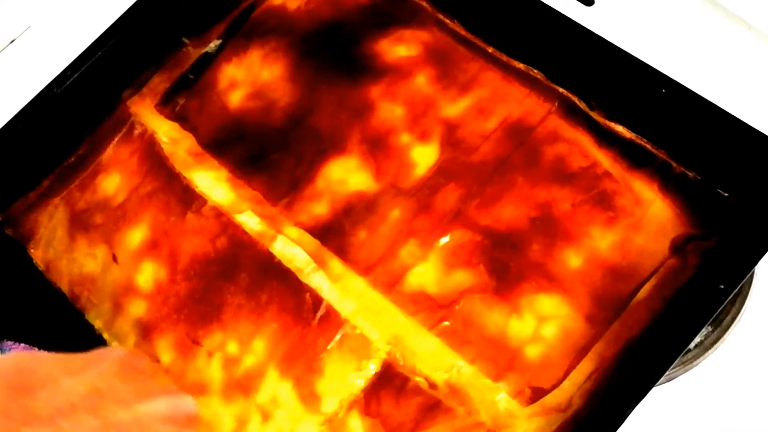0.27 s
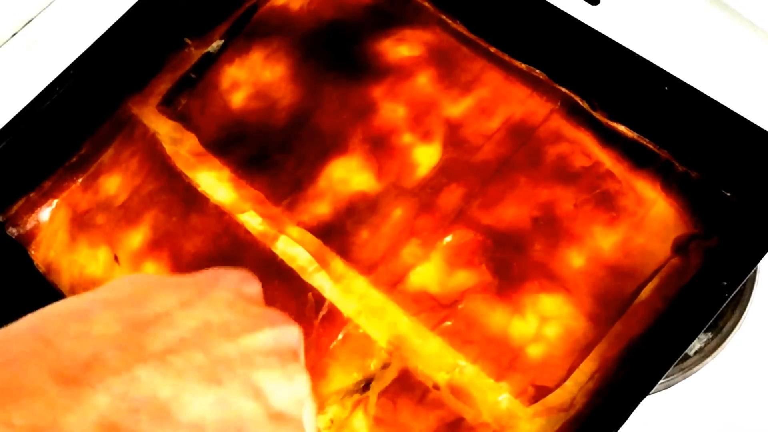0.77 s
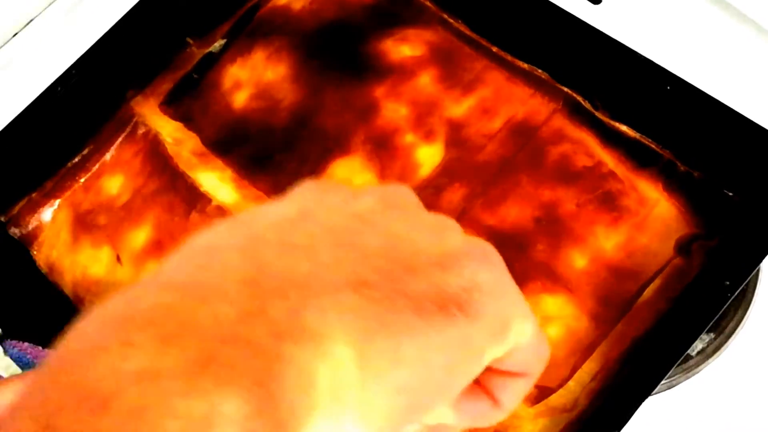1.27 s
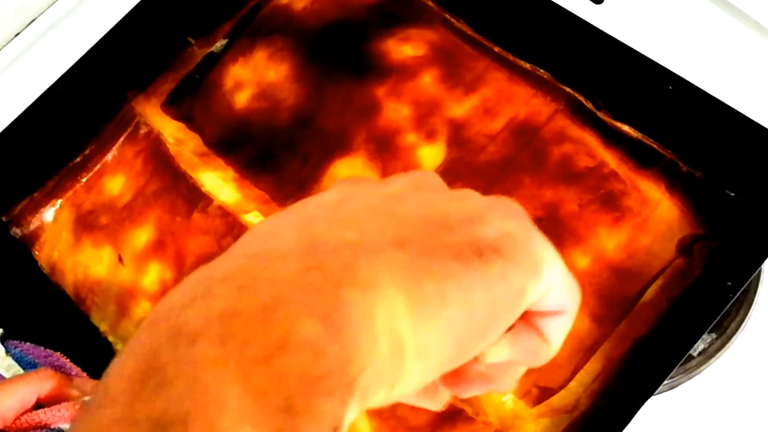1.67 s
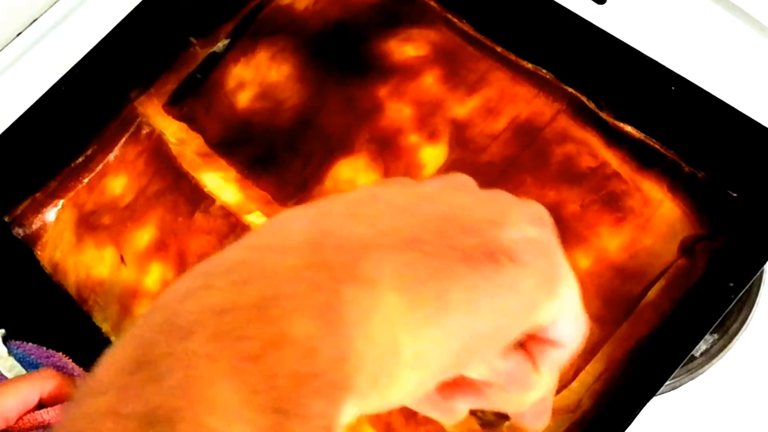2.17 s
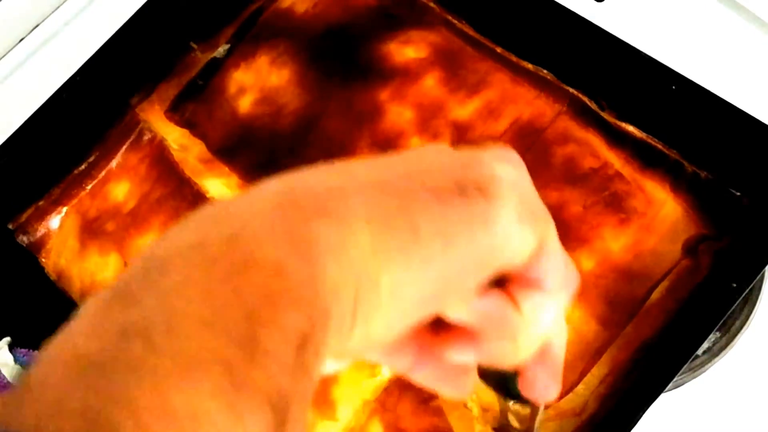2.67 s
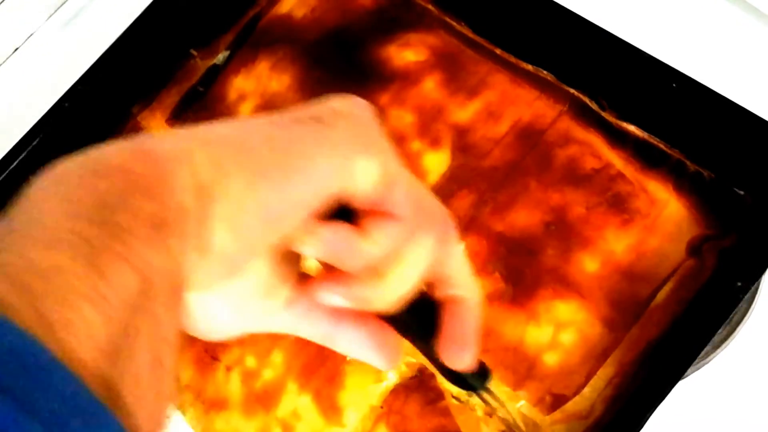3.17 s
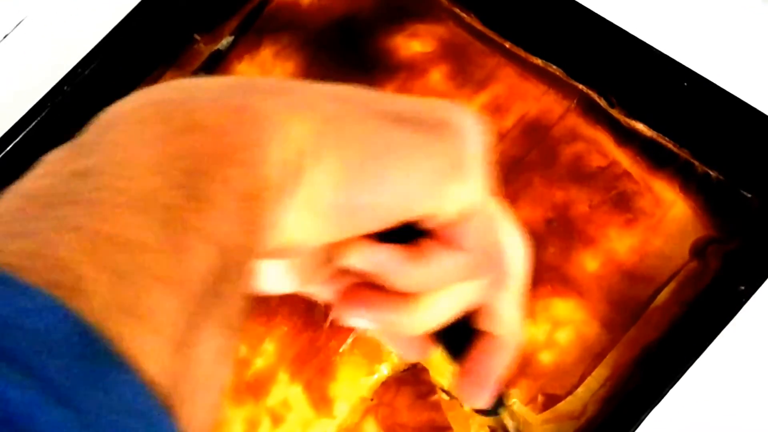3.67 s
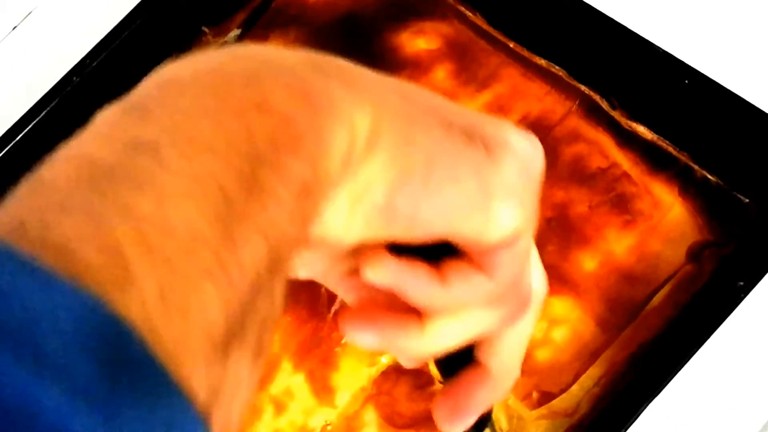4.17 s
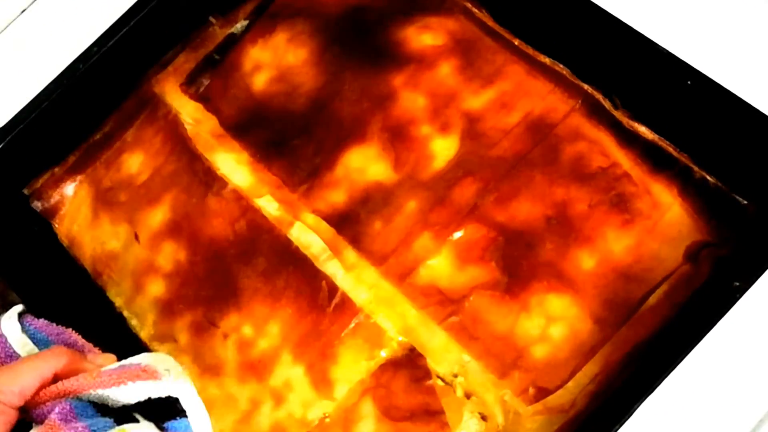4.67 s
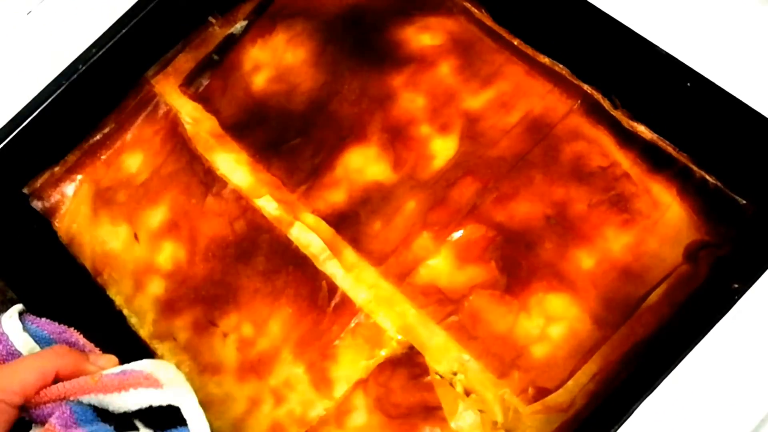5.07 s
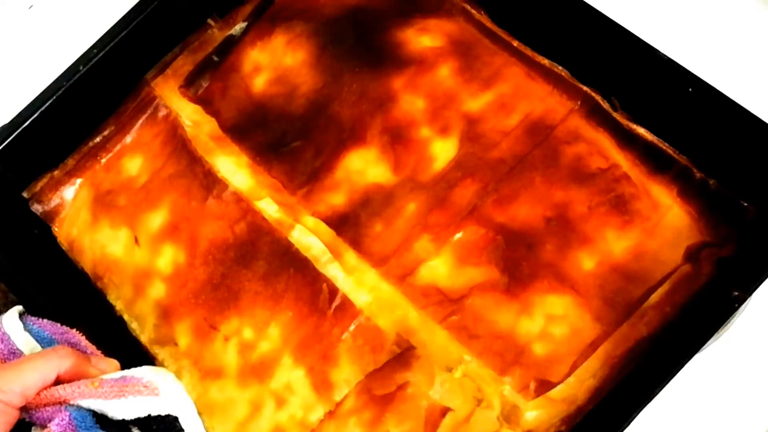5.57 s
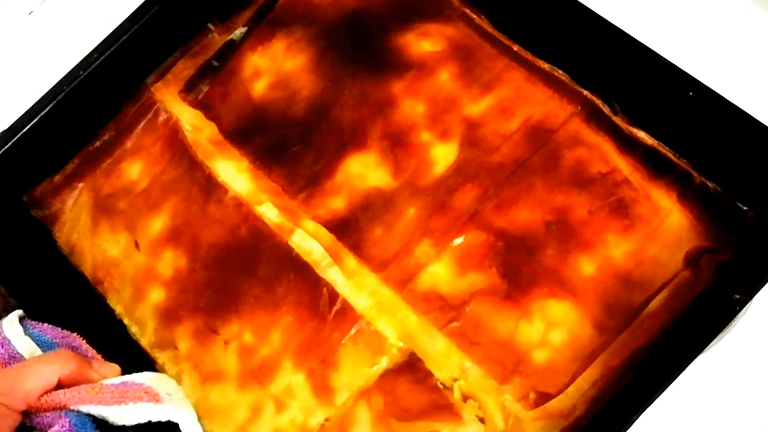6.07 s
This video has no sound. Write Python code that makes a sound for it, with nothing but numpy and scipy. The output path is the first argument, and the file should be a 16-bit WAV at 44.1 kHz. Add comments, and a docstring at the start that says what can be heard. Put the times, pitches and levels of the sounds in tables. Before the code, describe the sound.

Close stereo pickup, slightly louder on the left: a blade breaks brittle baked crust in a metal tin. A soft crunch and a short squeal lead to one hard metallic knock, far louder than anything after. Then small snaps, dull taps and gritty rubbing come and go, the tin thudding low on its support. The crunching grows denser, pauses, returns briefly and ends in a thin gliding scrape, with faint room hiss and hum.

```python
"""A knife cuts crisp baked pastry in a metal baking tin, close by in a kitchen with faint hiss and hum.
At once it knocks, breaks the crust and squeals, with one very hard knock that twangs blade and tin (modes).
Showers of random fractures then crackle on and off, amid filtered-grain scrapes and lighter knocks, while
the tin booms low on its support (pushed modes and shaped noise).
The last crackles give way to a final scrape with gliding squeals (narrow noise on a swept carrier)."""
import sys
import numpy as np
from scipy import signal
from scipy.fft import rfft, irfft, next_fast_len
from scipy.io import wavfile
from scipy.ndimage import uniform_filter1d

SR = 44100
rng = np.random.default_rng(int(sys.argv[2]) if len(sys.argv) > 2 else 0)


def generate_wav(sig):
    """Save sig (samples, or channels by samples) to the path in sys.argv[1] as 16-bit PCM at SR."""
    pcm = np.round(np.clip(np.atleast_2d(sig).T, -1, 1) * 32767).astype(np.int16)
    wavfile.write(sys.argv[1], SR, pcm)


N = 278667
TIME = np.arange(N) / SR

# The crust gives way. Each row: start in seconds, time scale of the break in seconds, level in dB,
# crispness (treble against the middle) in dB.
CRUST_BREAKS = [(0.065, 0.008, -21.5, -26), (0.503, 0.0026, -34.5, -9), (0.536, 0.0037, -42, -9),
                (0.577, 0.00041, -38.5, -11), (.622, 0.0015, -46.5, -3), (0.881, 0.0023, -34, -9),
                (0.907, 0.0015, -37.5, -8), (0.933, 0.0041, -35, -3), (1.027, 0.0042, -59, 7.5),
                (1.723, 0.0025, -43, 8), (1.74, 0.0064, -36.5, -5), (1.952, 0.0031, -41, -13.5),
                (1.974, 0.022, -37.5, 2.5), (2.1198, 0.0013, -25.5, -4.5), (2.295, 0.0033, -35.5, -15),
                (2.409, 0.0093, -30.5, -20.5), (2.457, 0.011, -42, -7), (2.512, .0015, -39.5, -7),
                (2.587, 0.0078, -28.5, -4), (2.812, 0.021, -42, 9), (2.842, 0.0093, -21, -19.5),
                (3.033, 0.0076, -37.5, -15.5), (3.064, 0.017, -38.5, -12.5), (3.347, 0.013, -36, 4.5),
                (3.383, 0.013, -31.5, -14), (3.438, 0.011, -27, -10.5), (3.597, 0.0054, -36, -6.5),
                (3.853, 0.011, -36.5, -2), (3.971, 0.005, -27, -8.5), (4.03, 0.0081, -35, -4.5),
                (4.108, 0.019, -28.5, -6), (5.025, 0.01, -34.5, -18), (5.083, 0.0044, -25, -18),
                (5.123, 0.0035, -36, -17), (5.185, 0.0051, -36, -5.5), (5.24, 0.014, -33.5, -6)]
# Blade and tin knock together. Each row: start in seconds, time scale in seconds, level in dB,
# weight (bass against the middle) in dB, treble against the middle in dB, twang of the blade in dB,
# ring of the tin in dB, pitch that the struck spot favours in Hz.
TIN_KNOCKS = [(0.033, 0.0065, -26, -7.5, -41, -50, -50, 520),
              (0.2225, 0.004, -3, -6.5, -14.5, -11, -43.5, 882),
              (0.6425, 0.0061, -27, 6.5, -20, -33, -41.5, 510),
              (.785, 0.0076, -26.5, -1, -13, -47, -43, 510),
              (0.806, 0.0032, -27, 3.5, -69, -38, -51.5, 520),
              (1.523, 0.0055, -28.5, 6.5, -23.5, -35, -42, 506),
              (1.753, 0.0045, -35.5, 3, -1.5, -52, -52, 510), (3.97, 0.0034, -39.5, 1, 7, -64, -47.5, 796),
              (4.495, 0.013, -36, -3.5, 3, -47, -41, 1230), (4.68, 0.009, -45, 2, -0.5, -50, -63, 3580),
              (4.949, 0.0077, -28, -15, -27, -37, -50, 1800),
              (5.694, 0.0083, -39, -0.5, -16.5, -50, -56, 2900)]
# Modes of the baking tin. Each row: frequency in Hz, level in dB, T60 in seconds.
TIN_MODES = [(513.5, 6.5, 0.21), (572, -0.5, 0.19), (772, -0.5, 0.2), (877, -2, .25), (1253, 2.5, 0.18),
             (1380, 2.5, 0.17), (1460, -4, 0.28), (2275, -2.5, 0.073), (2950, 2.5, 0.3), (3640, -2.5, 0.32),
             (4800, -3, 0.6)]


def amp(db):
    """Decibels to linear gain."""
    return 10 ** (np.asarray(db) / 20)


def evened(x):
    """Scales a signal to an RMS of 1."""
    return x / np.sqrt(np.mean(x ** 2) + 1e-20)


def read(points, hz):
    """Reads a curve of (Hz, value) points along a logarithmic frequency axis."""
    f, value = np.transpose(points)
    return np.interp(np.log(hz + 1), np.log(f + 1), value)


def add(mix, s, sound):
    """Lays a sound into the mix from second s on."""
    part = mix[max(round(s * SR), 0):][:len(sound)]
    part += sound[:len(part)]


def colour(x, points):
    """Filters by a spectrum in dB, with causal phase so that attacks stay sharp."""
    size = next_fast_len(x.shape[-1] + 2048)
    log_gain = np.log(amp(read(points, abs(np.fft.fftfreq(size, 1 / SR)))))
    response = np.exp(np.conj(signal.hilbert(log_gain)))[:size // 2 + 1]
    return irfft(rfft(x, size) * response, size)[..., :x.shape[-1]]


def convolve(x, response):
    """Runs a sound through an impulse response, channel by channel."""
    return signal.oaconvolve(np.atleast_2d(x), np.atleast_2d(response), axes=1)[:, :N]


def whitened(x, order=300):
    """Levels the broad trend of a short burst's spectrum; order is the smoothing width in bins."""
    z = rfft(x)
    trend = np.sqrt(uniform_filter1d(abs(z) ** 2, order) + 1e-12)
    return irfft(z / trend, x.shape[-1])


def grains(count, per_s, spread_db):
    """Tiny fractures at random moments: many small, a few large."""
    size = amp(spread_db * np.minimum(rng.exponential(1, count), 4))
    return size * rng.standard_normal(count) * (rng.random(count) < per_s / SR)


def pair(x):
    """Two independent signals become more alike towards the bass, as at two nearby microphones."""
    # Left-right likeness. Each row: frequency in Hz, share in common from 0 to 1.
    likeness = [(200, 0.9), (330, 0.3), (2000, 0.034)]
    same = np.clip(read(likeness, np.fft.rfftfreq(x.shape[1], 1 / SR)), 0, 1)
    left, other = rfft(x)
    right = same * left + np.sqrt(1 - same ** 2) * other
    return irfft(np.array([left, right]), x.shape[1])


def kitchen(x, near_db, room_db, direct_db=-7, near_t60=0.047, size=22050):
    """Direct sound, quick reflections from tin and worktop, and the tail of a small hard room."""
    # Decay of the room. Each row: frequency in Hz, T60 in seconds.
    room_decay = [(150, 0.8), (600, 0.45), (15000, 0.33)]
    t = np.arange(size) / SR
    echoes = rng.random((2, size)) < 3000 / SR  # about 3000 a second
    near = rng.standard_normal((2, size)) * echoes * amp(-60 * t / near_t60)
    near = pair(whitened(near, order=200)) * (t < 2 * near_t60)
    hz, when, z = signal.stft(rng.standard_normal((2, size)), SR, nperseg=256)
    z = z * amp(-60 * when / read(room_decay, hz)[:, None])
    tail = signal.istft(z, SR, nperseg=256)[1][:, :size]
    tail = pair(evened(tail * np.minimum(t / 0.0022, 1))) / np.sqrt(size)
    tail = tail * np.minimum(4 * (1 - t / t[-1]), 1) ** 2  # fades out over its last quarter
    return amp(direct_db) * x + convolve(x, amp(near_db) * near + amp(room_db) * tail)


def background(hiss_db=-74.5, hum_hz=98, hum_db=-77):
    """Faint room noise, as filtered noise, and the hum of an appliance, as one sine."""
    # Spectrum of the room noise. Each row: frequency in Hz, density in dB per Hz.
    hiss_spectrum = [(60, 0), (150, -4), (400, -17), (1400, -13), (10000, -21), (16000, -35)]
    hiss = evened(colour(pair(rng.standard_normal((2, N))), hiss_spectrum))
    return amp(hiss_db) * hiss + amp(hum_db) * np.sin(2 * np.pi * hum_hz * TIME)


def shoves(thump_db=-8.5, thump_s=0.0016, lean_s=0.0056):
    """Hand and weighty knocks push the tin on its support: (start s, level dB, push length s)."""
    # Further pushes on the tin: the hand pressing, and the hard knock's own push at 0.219 s. Each row: start in
    # seconds, level in dB.
    further_pushes = [(0.038, -28), (0.127, -29), (0.219, -32), (0.333, -32), (.369, -28.5), (1.711, -40.5),
                      (1.756, -39), (3.14, -42), (3.303, -33), (3.895, -29.5), (3.932, -34)]
    thumps = [(s, db + thump_db, thump_s) for s, _, db, weight, *_ in TIN_KNOCKS if weight > 0]
    return thumps + [(s, db, lean_s) for s, db in further_pushes]


def bumps(shake_db=0, size=22050):
    """Soft pushes set the tin booming on its support; a longer push sounds deeper."""
    # Pressure of the hands shakes the tin. Each row: time in seconds, level in dB.
    shake_level = [(0.0, -48), (.32, -51.5), (0.385, -36.5), (.48, -49.5), (1.2, -75), (3.2, -62),
                   (3.4, -49.5), (3.84, -68.5), (3.92, -40.5), (4.42, -73.5), (6.08, -67), (6.2, -84)]
    # Modes of the tin on its support. Each row: frequency in Hz, level in dB, T60 in seconds.
    support_modes = [(38.52, -20, 1), (104.6, -6.5, 0.35), (184, 1.5, 0.063), (254, 1, 0.15),
                     (310, -8.5, 0.27)]
    # Spectrum of the shaking. Each row: frequency in Hz, density in dB per Hz.
    rumble_spectrum = [(15, -25.5), (36, 1.5), (55, -13.5), (82, -14.5), (106, 1), (135, -14.5), (230, -19),
                       (900, -66.5)]
    pushes, t = np.zeros(N), np.arange(size) / SR
    for s, db, length in shoves():
        push = np.hanning(int(length * SR) + 3)
        add(pushes, s, amp(db) * push / push.sum())
    boom = np.zeros(size)
    for k, (hz, db, t60) in enumerate(support_modes):
        boom += (-1) ** k * amp(db - 60 * t / t60) * np.sin(2 * np.pi * hz * t)  # alternating polarity
    when, level_db = np.transpose(shake_level)
    rumble = evened(colour(rng.standard_normal(N), rumble_spectrum))
    shake = rumble * amp(np.interp(TIME, when, level_db))
    return amp(shake_db) * shake + convolve(pushes, boom)


def ringing(modes, apart=1.6, waver=0.033, order=300, size=16000):
    """Dying modes that waver as pastry and hand load the tin, a little out of phase at the two microphones."""
    t = np.arange(size) / SR
    phases = 2 * np.pi * rng.random((len(modes), 1, 1))
    phases = phases + apart * rng.uniform(-1.9, 1, (len(modes), 2, 1))
    drift = evened(uniform_filter1d(rng.standard_normal((len(modes), size)), order))
    clocks = t + waver * np.cumsum(drift, axis=1) / SR  # each mode runs on its own unsteady clock
    out = np.zeros((2, size))
    for (hz, db, t60), phase, clock in zip(modes, phases, clocks):
        out += amp(db - 60 * t / t60) * np.sin(2 * np.pi * hz * clock + phase)
    return out


def tin(x, ring_db):
    """The tin rings along with whatever touches it."""
    return x + amp(ring_db) * convolve(x, ringing(TIN_MODES))


def squeals():
    """Stick and slip in a narrow resonance that glides as the blade moves."""
    # The blade catches. Each row: start in seconds, length in seconds, start pitch in Hz,
    # end pitch in Hz, bandwidth in Hz, level in dB.
    catches = [(0.187, 0.05, 3010, 4510, 1200, -45), (1.304, 0.064, 5455, 6076, 698, -55),
               (4.68, 0.11, 4060, 3620, 410, -61.5), (5.779, 0.13, 890, 788, 80.2, -58),
               (5.789, 0.12, 3354, 3130, 201.3, -59), (5.811, 0.27, 4180, 4590, 201, -56),
               (5.871, 0.065, 1301, 1237, 50.3, -49.5), (5.912, 0.05, 1410, 2014, 295, -46.5)]
    out = np.zeros(N)
    for s, length, start_hz, end_hz, width, db in catches:
        count = int(length * SR)
        pole = np.exp(-np.pi * width / SR)
        wobble = signal.lfilter([1], [1, -pole], rng.standard_normal((2, N // 20)))[:, :count]
        turn = 2 * np.pi * np.cumsum(np.linspace(start_hz, end_hz, count)) / SR
        squeal = wobble[0] * np.cos(turn) + wobble[1] * np.sin(turn)
        add(out, s, amp(db) * evened(squeal * np.hanning(count)))
    return out


def strokes(lead_s=0.029, trail_s=0.084, slide_db=-26.5, slide_crisp_db=7, slide_groan_db=-9.5):
    """All strokes and slides: (start s, hardest s, end s, groan dB, rubbing dB, flaking dB)."""
    # Long strokes of the blade. Each row: start in seconds, hardest moment in seconds, end in seconds,
    # rubbing level in dB, flaking crust in dB and groaning tin in dB, both against the rubbing.
    # A row that ends before it starts is silent.
    long_strokes = [(0, 0.036, 0.28, -43.5, -11.5, -3.5), (0.713, 0.774, 0.87, -50.5, -14.5, -2),
                    (1.018, 1.094, 1.09, -72.5, 15.5, -19.5), (1.588, 1.642, 1.79, -58.5, -21, 2),
                    (2.203, 2.227, 2.323, -53.5, -6, 8), (2.393, 2.465, 2.52, -59, -44, 5.5),
                    (2.533, 2.59, 2.707, -55.5, -6, 10.5), (3.083, 3.185, 3.315, -59.5, -16.5, -4),
                    (3.352, 3.401, 3.26, -45, -14, 1), (4.13, 4.205, 3.72, -56.5, 0, 0),
                    (4.748, 4.839, 4.9, -53.5, -4, -7), (4.924, 4.987, 5.23, -49.5, -7.5, -3),
                    (5.033, 5.13, 5.26, -57.5, 1.5, 2), (5.736, 5.93, 6.1, -49, -16, -11.5),
                    (5.906, 5.984, 6.04, -50, 11, -29)]
    # the blade presses in before each break and slides on after it
    slides = [(s - lead_s, s + length, s + length + trail_s, db + slide_db, crisp + slide_crisp_db, slide_groan_db)
              for s, length, db, crisp in CRUST_BREAKS]
    return [(start, hardest, end, db + groan, db, db + crisp)
            for start, hardest, end, db, crisp, groan in [*long_strokes, *slides]]


def crumbs(per_s, centre_hz, octaves, cycles, spread_db=4, size=2048):
    """Separate crumbs give way at random moments, each ringing for a few cycles at a pitch of its own."""
    out, t = np.zeros(N), np.arange(size) / SR
    for when, strength, pitch in rng.random((size, 3))[:int(per_s * N / SR)]:
        turns = t * centre_hz * 2 ** (octaves * (2 * pitch - 1))
        ring = np.exp(-turns / cycles) * np.sin(2 * np.pi * turns)
        add(out, when * N / SR, amp(-spread_db * np.log(strength + .02)) * ring)
    return evened(out)


def drag(uneven_db=2.5, fade_db=16, crunch_db=0, crumbs_db=-3.5):
    """Slips, crumbs and flakes swell and fade with each stroke, surging as the knife sticks and gives."""
    # Spectra of the groaning tin, the rubbing blade and the flaking crust.
    # Each row: frequency in Hz, density in dB per Hz.
    groan_spectrum = [(240, -2), (530, 3), (680, -10.5), (880, 0), (1100, -6.5), (1600, -8), (4000, -34)]
    rub_spectrum = [(200,-26), (700,-13.5), (1300,1.5), (1800,0.5), (2700,-1), (4200,-2), (6000,-6.5),
                    (12000,-24)]
    flake_spectrum = [(800, -28), (2500, -4.5), (5000, 5), (9000, 6.5), (13000, -3.5), (16000, -9.5)]
    effort = np.zeros((3, N))  # groan, rubbing, flaking
    for start, hardest, end, *levels in strokes():
        span = slice(max(round(start * SR), 0), round(end * SR))
        shape = np.interp(TIME[span], [start, hardest, end], [0, 1, 0])
        swell = amp(fade_db * (shape - 1)) * np.minimum(8 * shape, 1)
        effort[:, span] += amp(levels)[:, None] * swell
    slow = [(1, 1.5), (45, -1.5), (150, -34.5), (1000, -85.0)]  # Hz, dB per Hz
    surge = amp(uneven_db * evened(colour(rng.standard_normal(N), slow)))
    groan = evened(colour(grains(N, 1500, 0.85) * surge, groan_spectrum))
    groan = groan + amp(crunch_db) * crumbs(190, 930, .25, 7.4)  # hollow crunches
    rub = evened(colour(grains(N, 2500, 3.0) * surge, rub_spectrum))
    rub = rub + amp(crumbs_db) * crumbs(160, 2300, 0.9, 8.3)  # coarse crumbs
    flake = colour(grains(N, 730, 2.7) * surge, flake_spectrum)
    return evened(groan) * effort[0] + evened(rub) * effort[1] + evened(flake) * effort[2]


def scraping(turns_per_s=2.7):
    """The blade travels as it scrapes, so its sound keeps shifting between two reflection paths."""
    sound = tin(drag() + squeals(), ring_db=-61.0)
    turn = 2 * np.pi * turns_per_s * TIME
    return sum(kitchen(sound * share, near_db=-1.0, room_db=-9.5) for share in (np.cos(turn), np.sin(turn)))


def bursts(rows, per_s=3500, spread_db=3.5, patchy_db=3.0, snap_s=0.0032, size=4096):
    """Each contact or break is a shower of fractures that swells and dies, with a colour of its own."""
    out, t = np.zeros(N), np.arange(size) / SR
    hz = np.geomspace(100, 16000, 30)
    for s, length, db, bass_db, treble_db in rows:
        u = t / max(length, .001)
        shower = grains(size, per_s, spread_db) + 0.4 * rng.standard_normal(size)
        shower = whitened(shower * u ** 1.87 * np.exp(-3 * u))
        shower[np.argmax(u > .5)] += 3 * np.exp(-length / snap_s)  # one clean snap, strongest in short breaks
        tone = [(100, bass_db - 16.0), (380, bass_db - 6), (530, bass_db), (680, bass_db - 5.5),
                (900, 0.9 * bass_db + 0.5), (1400, 0.75), (2250, 0.39 * treble_db + 0.5),
                (2800, 0.43 * treble_db), (4100, 0.23 * treble_db), (6000, 0.79 * treble_db + 0.5),
                (10000, treble_db), (16000, 1.3 * treble_db - 7.5)]
        patchy = np.transpose([hz, read(tone, hz) + patchy_db * rng.standard_normal(len(hz))])
        burst = colour(whitened(shower) * (u < 4), patchy)
        add(out, s, amp(db) * np.sqrt(SR / 100) * burst)  # level counted over 10 ms
    return out


def struck_tin(low_db=-11.5, high_db=-11, top_db=-11):
    """Each knock rings the tin; the spot that is hit decides which modes stand out."""
    out = np.zeros((2, N))
    for s, length, *_, db, spot_hz in TIN_KNOCKS:
        favour = [(spot_hz / 2, low_db), (spot_hz, 0), (2 * spot_hz, high_db), (8 * spot_hz, top_db)]
        ring = ringing([(hz, db + mode_db + read(favour, hz), t60) for hz, mode_db, t60 in TIN_MODES])
        for side, sound in zip(out, ring):
            add(side, s, sound * np.minimum(np.arange(len(sound)) / SR / length, 1))
    return out


def twang(s, length, db, spot_hz, t60=0.081, db_per_octave=-6, size=4096):
    """The hand-damped blade rings briefly; modes far from the pitch of the struck spot are weaker."""
    # Modes of the knife blade. Each row: frequency in Hz, level in dB.
    blade_modes = [(1260, -2.5), (1365, 2), (1490, -4), (1820, -1), (2300, 0.5), (2915, -3), (3700, 0.5),
                   (4230, 0.5)]
    out, t = np.zeros(N), np.arange(size) / SR
    ring = np.zeros(size)
    for hz, mode_db in blade_modes:
        gain = amp(mode_db + db_per_octave * abs(np.log2(hz / spot_hz)))
        ring += gain * np.sin(2 * np.pi * (hz * t + rng.random()))
    add(out, s, ring * amp(db - 60 * t / t60) * np.minimum(2 * t / length, 1))
    return out


def knocks(count=3):
    """Hard contacts at several spots twang the blade and ring the tin."""
    blows = [bursts([row[:5]], patchy_db=2.5) for row in TIN_KNOCKS]
    blade = sum(twang(s, length, twang_db, spot_hz) for s, length, *_, twang_db, _, spot_hz in TIN_KNOCKS)
    contacts = sum(kitchen(sum(blows[k::count]), near_db=-5.0, room_db=-6.0, direct_db=-5.0)
                   for k in range(count))
    return contacts + struck_tin() + kitchen(blade, near_db=-12, room_db=-13.5, direct_db=-2.5)


def crust(ring_db=-56.5, count=4, body_db=-5, body_at_s=0.0061, body_db_per_decade=12.5):
    """The crust breaks at several spots, each with its own path to the microphones."""
    breaks = []
    for s, length, db, crisp in CRUST_BREAKS:
        # a longer break goes deeper into the pastry and has more bass
        bass_db = body_db + body_db_per_decade * np.log10(length / body_at_s)
        breaks.append((s, length, db, bass_db, crisp))
    return sum(kitchen(tin(bursts(breaks[k::count]), ring_db), near_db=-5.0, room_db=-9.5)
               for k in range(count))


def scene(left_db=1.67, right_db=0.0, left_lead_s=0.00003):
    """The knife, louder and a touch earlier on the left, over the bumping tin and the room noise."""
    left, right = crust() + knocks() + scraping()
    size = next_fast_len(N)
    delay = np.exp(-2j * np.pi * np.fft.rfftfreq(size, 1 / SR) * left_lead_s)
    right = irfft(rfft(right, size) * delay, size)[:N]
    return np.array([amp(left_db) * left, amp(right_db) * right]) + bumps() + background()


def record(dry, edge_hz=16200):
    """Soft overload of the hardest peaks, then the recorder's band limit."""
    dry = .85 * np.tanh(dry / .85)
    band_limit = signal.firwin(511, edge_hz, window=("kaiser", 9), fs=SR)
    return signal.oaconvolve(dry, band_limit[None], "same")


dry = scene()
out = record(dry)
generate_wav(out)
```